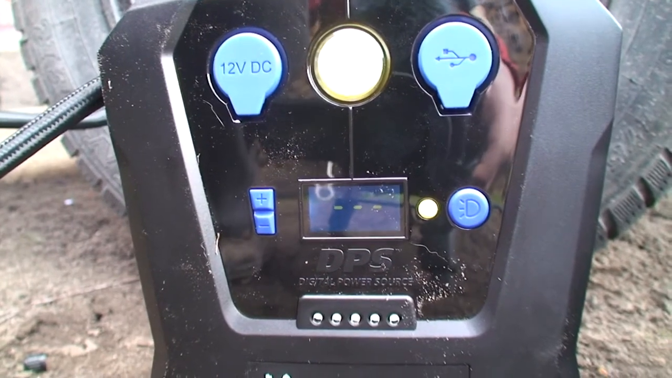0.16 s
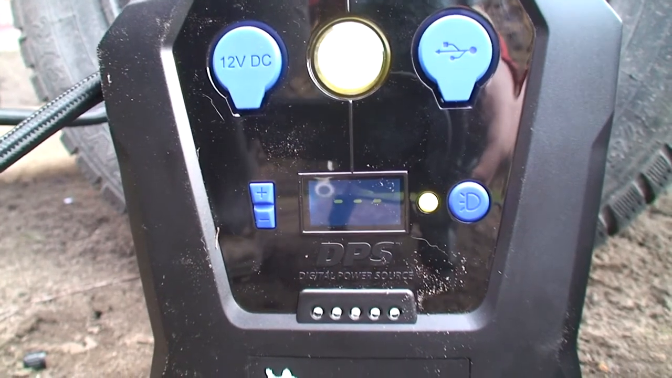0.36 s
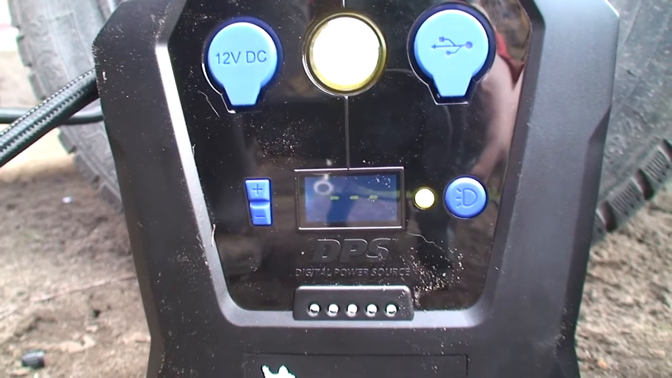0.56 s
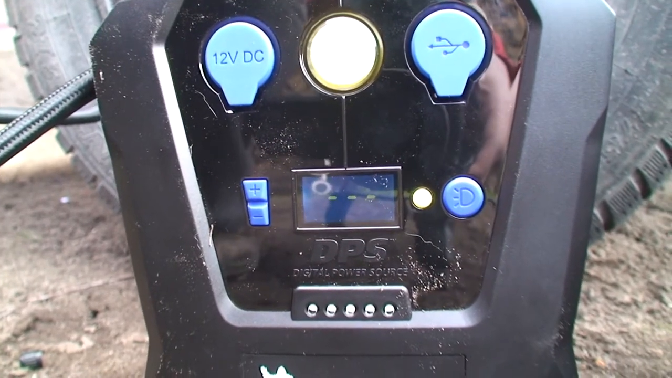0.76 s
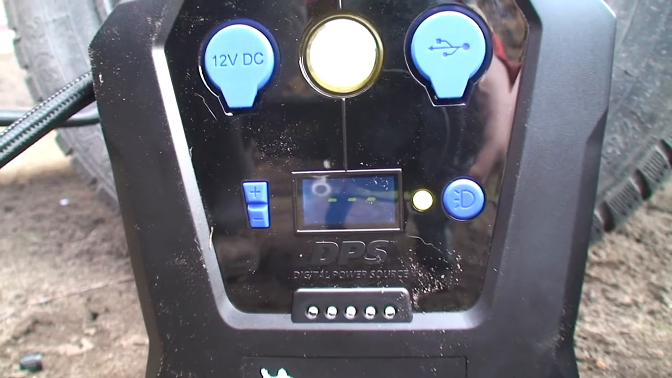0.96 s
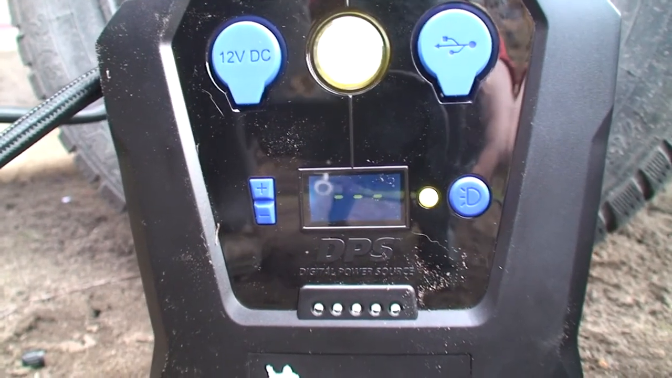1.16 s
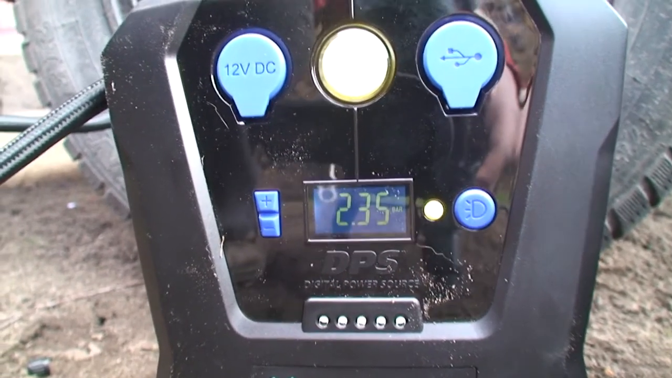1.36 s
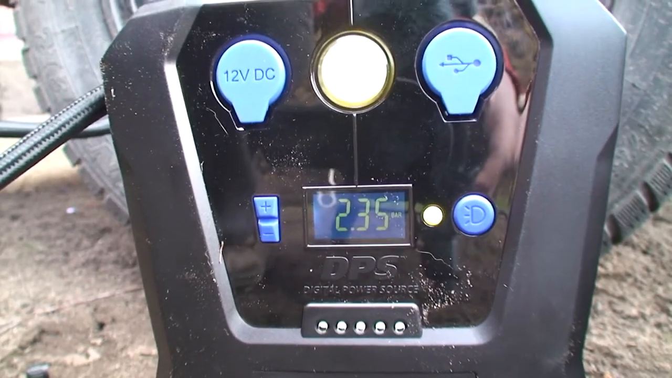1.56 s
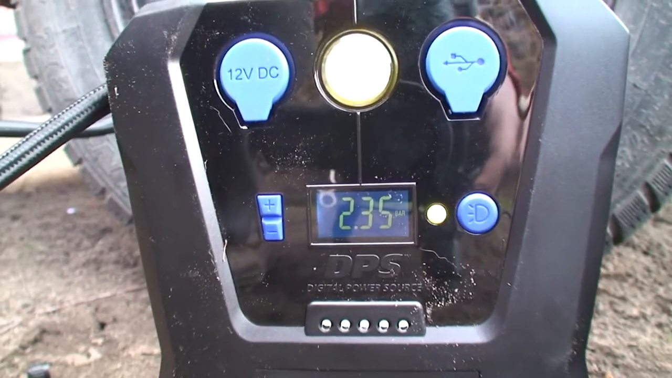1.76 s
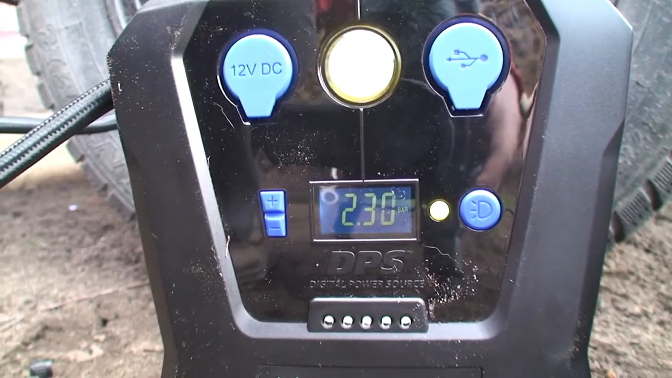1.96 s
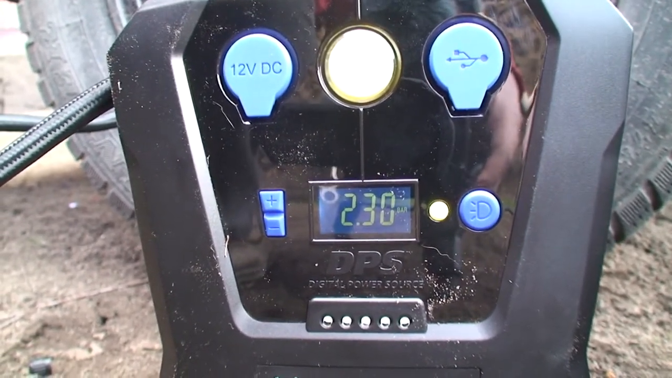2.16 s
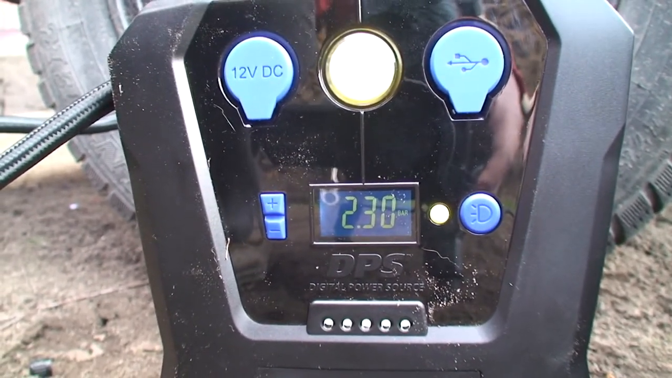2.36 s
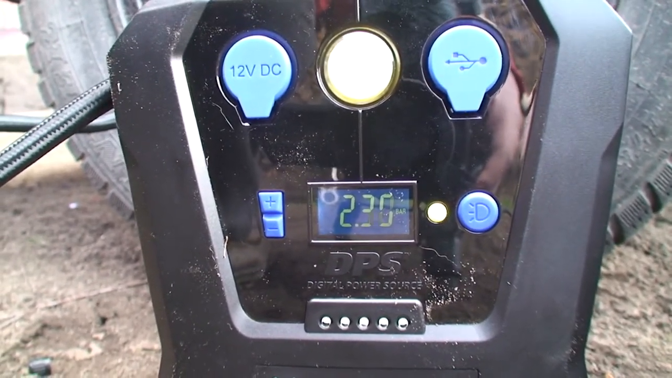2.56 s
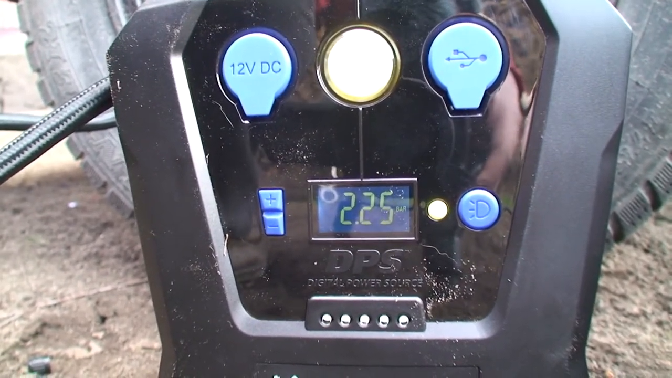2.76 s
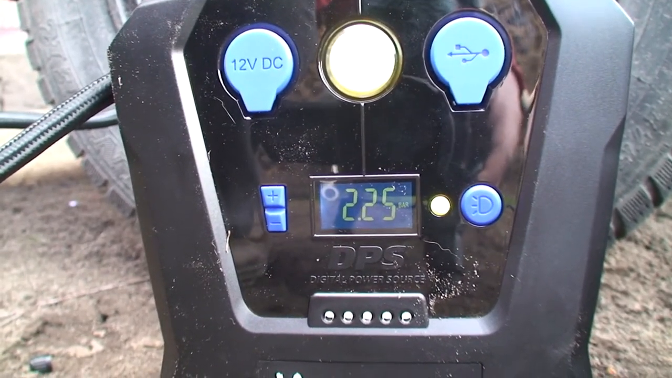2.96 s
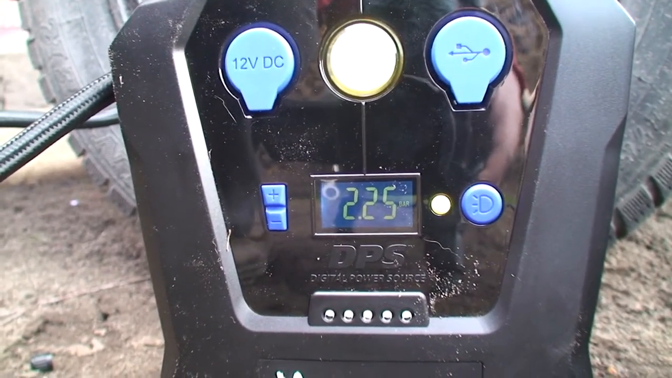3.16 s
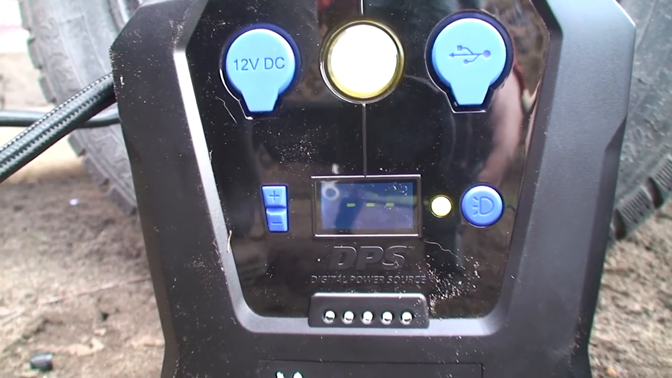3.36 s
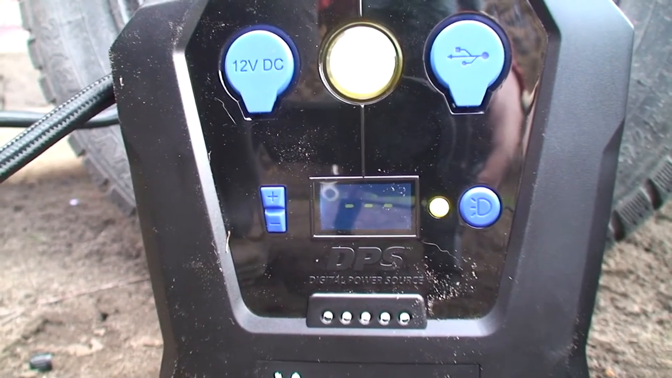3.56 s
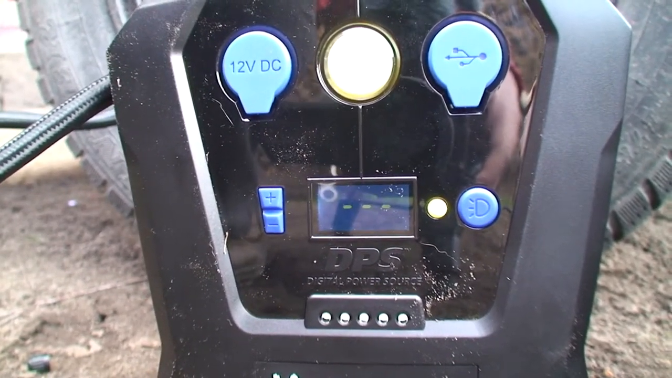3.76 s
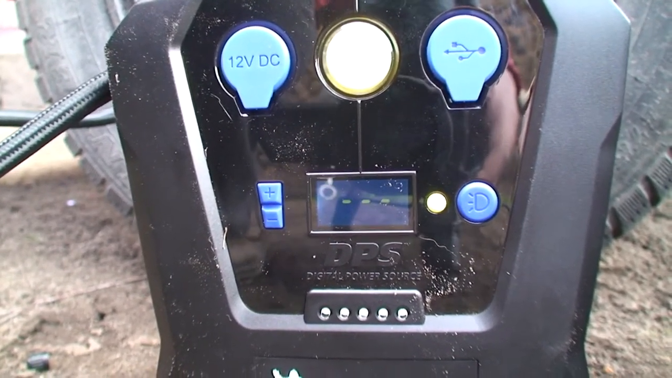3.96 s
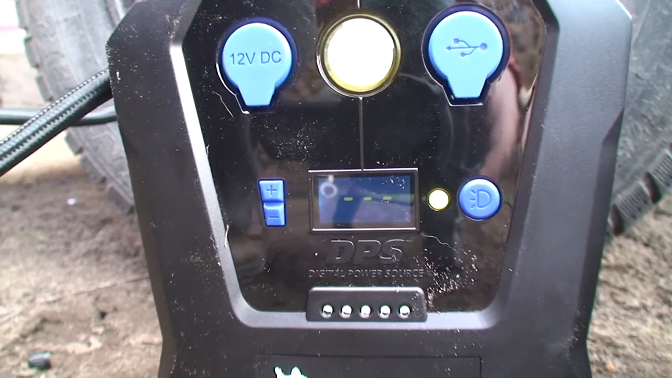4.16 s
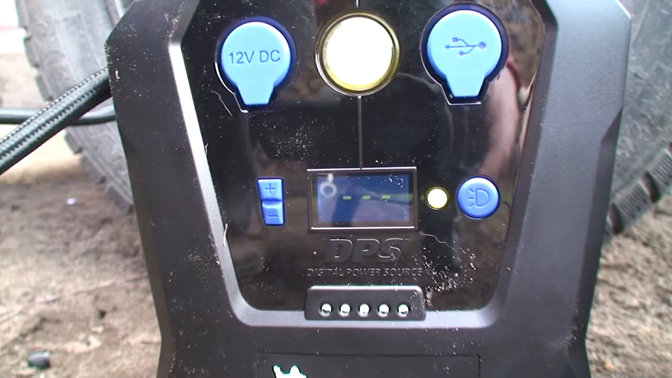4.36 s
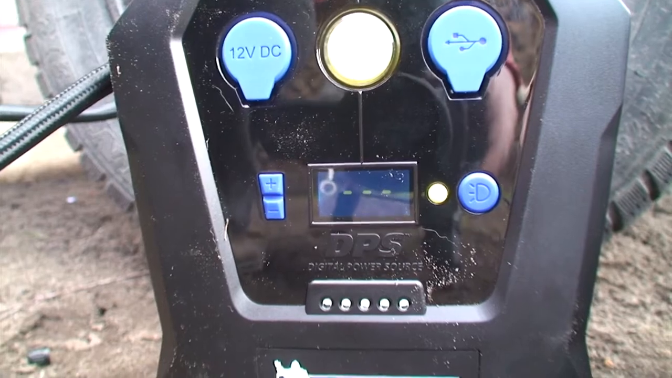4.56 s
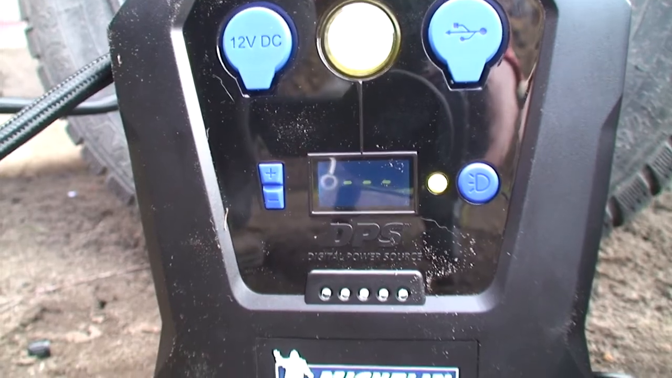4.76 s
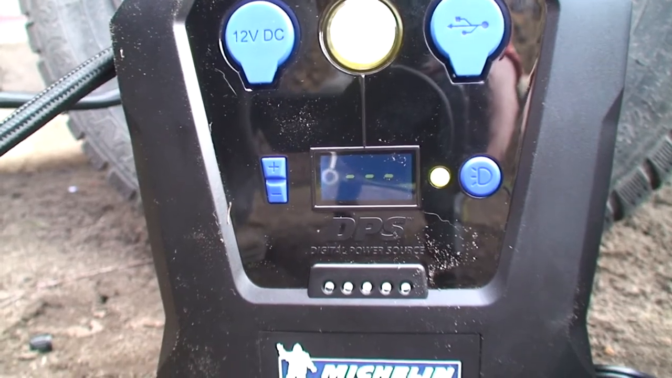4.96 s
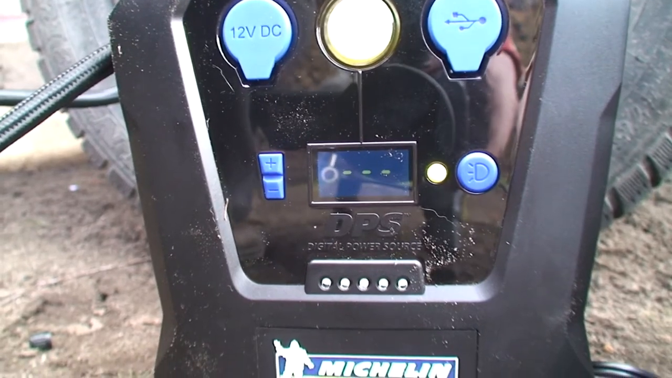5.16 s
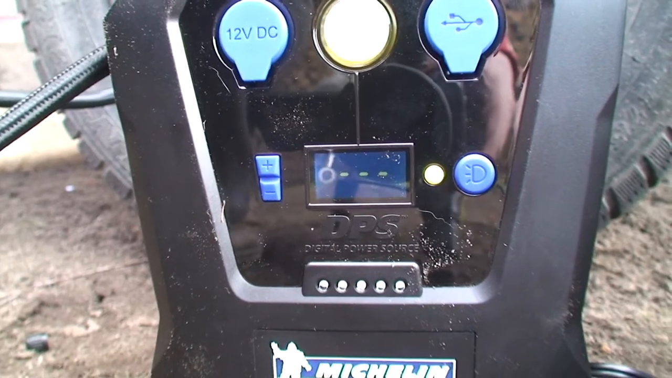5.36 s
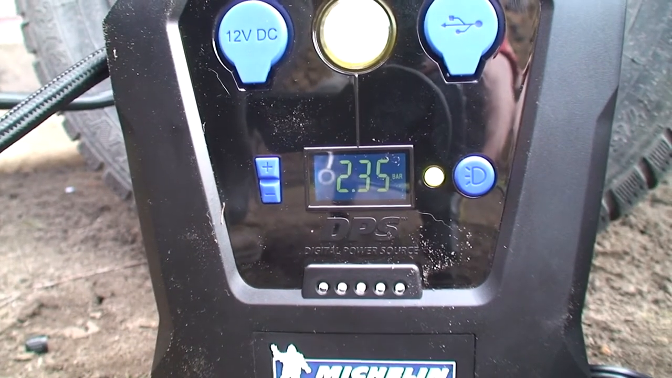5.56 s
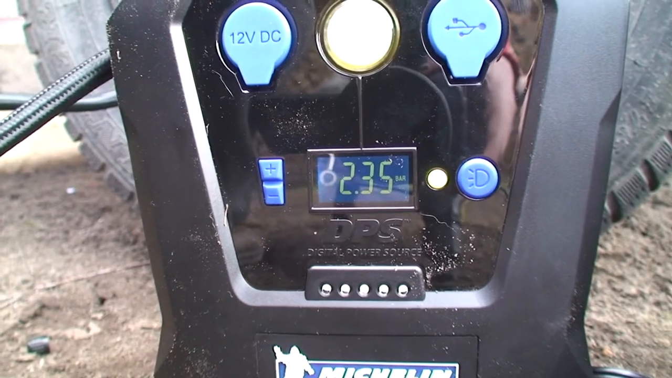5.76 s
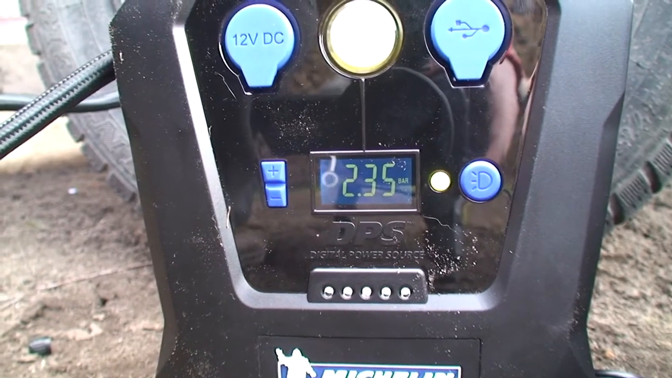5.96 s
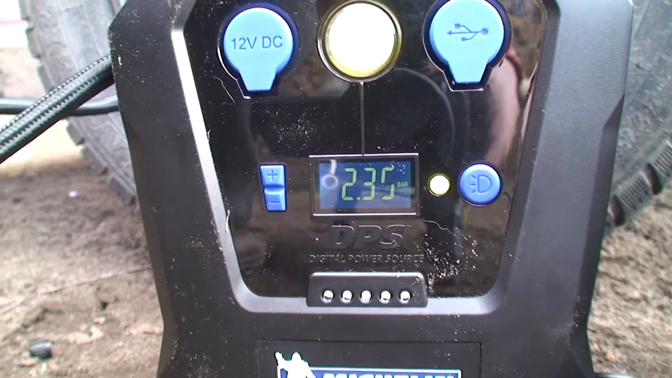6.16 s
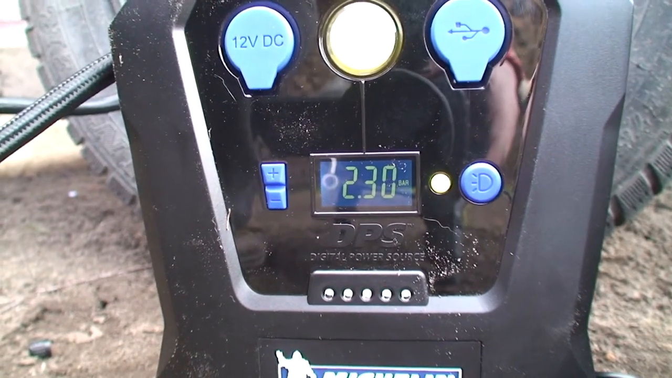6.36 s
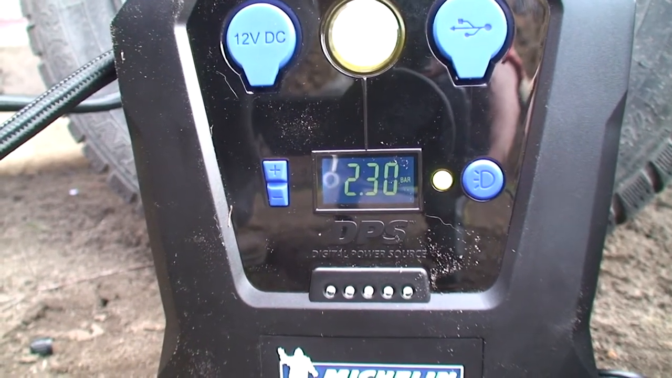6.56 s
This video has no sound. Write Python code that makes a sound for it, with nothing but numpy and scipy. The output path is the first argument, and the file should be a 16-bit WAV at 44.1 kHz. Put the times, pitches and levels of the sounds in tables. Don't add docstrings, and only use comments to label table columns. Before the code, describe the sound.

A portable tyre inflator rattles loudly near the microphone: rapid piston puffs, gear chatter, valve slaps and motor whine fused into a rough drone. It cuts off, slowing briefly into separate clunks, and rests over faint traffic, hiss, tiny bird whistles and dry leaves. Then it bursts back to full speed almost instantly, with a soft handling bump buried in the noise, before stopping again into quiet open air.

```python
import sys
import numpy as np
from scipy import signal
from scipy.fft import rfft, irfft, next_fast_len
from scipy.io import wavfile
from scipy.ndimage import uniform_filter1d, map_coordinates

SR = 44100
rng = np.random.default_rng(int(sys.argv[2]) if len(sys.argv) > 2 else 0)


def dump(signal):
    limited = np.clip(np.atleast_2d(signal).T, -1, 1)
    pcm = np.round(limited * 32767).astype(np.int16)
    wavfile.write(sys.argv[1], SR, pcm)


def boost(x):
    u = np.asarray(x, float) / 20
    return 10 ** u


N = 291501
TIME = np.arange(N) / SR
WHEEL, PINION = 46, 10
CYCLE = 5
ALL_TURNS = 146

# on_s, full_speed_turns_per_s, off_s, coasting_time_constant_s
MOTOR_RUNS = [
    (-1, 43.9161, 1.1007, .0795),
    (3.2257, 44.0357, 5.3554, .0950),
]
DRAG = .0947


def unit(x):
    return x / np.sqrt(np.mean(x[..., :SR] ** 2) + 1e-20)


def along(points, hz):
    f, v = np.transpose(points)
    return np.interp(np.log(hz + 1), np.log(f + 1), v)


def wobble(rate):
    coarse = TIME[::64]
    knots = rng.standard_normal(int(N * rate / SR) + 4)
    return np.interp(TIME, coarse, map_coordinates(knots, [coarse * rate]))


def filtered(x, response):
    m = 2 * next_fast_len(N // 2 + SR // 4)
    return irfft(rfft(x, m) * response(np.fft.rfftfreq(m, 1 / SR)), m)[..., :N]


def causal(db):
    c = irfft(np.log(boost(db)))
    c[1:len(c) // 2] *= 2
    c[len(c) // 2 + 1:] = 0
    return np.exp(rfft(c))


def pulses(times, sizes):
    at = times * SR
    k = np.floor(at)[:, None] + np.arange(-7, 9)
    offset = k - at[:, None]
    w = np.sinc(offset) * np.cos(np.pi * offset / 16) ** 2
    slots = np.where(k < 0, N, np.minimum(k, N)).astype(int)
    return np.bincount(slots.ravel(), (w * sizes[:, None]).ravel(), N + 1)[:N]


def ring(hz, width):
    t = TIME[:SR // 50]
    swell = np.e * np.pi * width * t * np.exp(-np.pi * width * t)
    return swell * np.sin(2 * np.pi * hz * t)


def turns():
    spin_up_s, sag_per_s = .0355, .1933
    first_turn = -.3703
    total = 1e-6
    for on, full, off, coast in MOTOR_RUNS:
        driven_s = np.clip(TIME, on, off) - on
        pull = (full - sag_per_s * driven_s) * (1 - np.exp(-driven_s / spin_up_s))
        coasting = (1 + DRAG) * np.exp(-np.maximum(TIME - off, 0) / coast) - DRAG
        total = total + pull * np.maximum(coasting, 0)
    return first_turn + np.cumsum(total) / SR


def when(turn):
    return np.interp(turn, turns(), TIME, left=-1, right=TIME[-1] + 1)


def stall(run):
    return run[2] + run[3] * np.log(1 + 1 / DRAG)


def piston(speed):
    # multiple_of_running_speed, level_db
    intake = [(1, -25), (2, -13.5), (3, -15), (4, -11.5), (5, -11), (6, -17.5), (7, -12), (8, -10), (9, -5),
              (10, 0.5), (11, -7), (12, -0.5)]
    times = when(np.arange(ALL_TURNS)) - .0022
    colour = [(20, -60)] + [(43.7 * k, db) for k, db in intake]
    colour += [(570, -13), (620, -16), (660, -20), (760, -40), (1500, -60)]
    puff_db = -27.5 + rng.normal(0, 0.18, len(times))
    train = pulses(times, np.interp(times, TIME, speed) ** .75 * boost(puff_db))

    def mouth(hz):
        low = np.minimum(hz, 300)
        late = np.exp(-2j * np.pi * .012 * low * (1 - low / 600))
        return causal(along(colour, hz)) * late

    puffs = filtered(boost(57) * train, mouth)
    ground = [(15, -40), (40, -11.5), (250, -16), (500, 3.5), (700, -29.5), (1500, -59.5)]
    rumble = unit(filtered(rng.standard_normal(N), lambda hz: boost(along(ground, hz))))
    return puffs + boost(-34.5) * speed * rumble


def housing(hz):
    # pitch_hz, width_hz, level_db
    resonances = [(1190, 230, -11.5), (1707, 81, -12.5), (1990, 230, -8), (2248, 36, -6.5),
                  (2560, 40, -4.5), (2705, 83, -6), (3045, 42, -4), (3550, 100, -4.5), (3900, 380, -15.5),
                  (4140, 63, -12.5), (4415, 180, -9.5), (4790, 64, -13.5), (5500, 140, -13.5),
                  (6210, 380, -14), (8690, 300, -26.5), (9600, 250, -23), (10770, 350, -26.5),
                  (14450, 300, -30), (15600, 250, -30.5)]
    # frequency_hz, level_db_per_hz
    casing = [(400, -22), (700, -5.5), (925, -13), (1100, -9), (1620, -17), (2400, -12.5), (3230, -14),
              (3930, -13), (5200, -19.5), (6250, -19.5), (7400, -20), (8300, -24.5), (12700, -47.5),
              (15500, -36)]
    modes = 0
    for c, w, db in resonances:
        modes = modes + boost(2 * db) * (hz * w) ** 2 / ((c * c - hz * hz) ** 2 + (hz * w) ** 2)
    broad = boost(2 * np.maximum(along(casing, hz) - 2.5, -70))
    return causal(10 * np.log10(modes * np.clip(hz / 600, 0, 1) ** 4 + broad))


def effort(crank):
    coast_turns = [-2.2, -1.25, -.7, -.44, -.32, -.23, -.07, .1, .27]
    coast_db = [-1, 1, -12.5, -3.5, -1, -24, -12.5, -17.5, -22.5]
    lead_s, mesh_s = .0015, .028
    level_db, rest = np.zeros(N), np.zeros(N)
    for run in MOTOR_RUNS:
        since_s = TIME - run[0] + lead_s
        on = TIME > run[0] - lead_s
        last = np.floor(np.interp(stall(run), TIME, crank))
        mesh = 1 - np.exp(-np.maximum(since_s, 1e-5) / mesh_s)
        level_db[on] = (np.interp(crank - last, coast_turns, coast_db) + 20 * np.log10(mesh))[on]
        rest[on] = np.maximum(TIME - stall(run), 0)[on]
    return level_db, rest


def band(x, lo_hz, hi_hz):
    return unit(filtered(x, lambda hz: 1 / np.sqrt((1 + (lo_hz / (hz + 1)) ** 12) * (1 + (hz / hi_hz) ** 12))))


def gears(crank, speed):
    # running_db, share_of_effort, duller_when_slow_db, lost_at_rest_db_per_s
    gear_levels = [
        (-19, 0.94, 3, 450),
        (-20.5, 1.05, 5.5, 900),
        (-24.5, 1.05, 8, 700),
        (-20, .8, 2.5, 279),
    ]
    # frequency_hz, level_db_per_hz
    hollow = [(150, -29), (300, -15.5), (520, -6), (730, -3.5), (870, -8), (1000, -18.5), (1500, -49.5)]
    per_tooth = 4
    per_turn = WHEEL * per_tooth
    hit = np.arange(-per_turn, ALL_TURNS * per_turn)
    wheel = rng.standard_normal((3, per_turn))[:, hit % per_turn]
    pinion = rng.standard_normal((2, PINION * per_tooth))[:, hit % (PINION * per_tooth)]
    luck = rng.standard_normal((len(hit), 2))
    size = .6 * wheel[0] + .35 * pinion[0] + .5 * wheel[1] * pinion[1] + .4 * luck[:, 0]
    times = when((hit + .3 * wheel[2]) / per_turn) + 14e-6 * luck[:, 1]
    taps = pulses(times, size * (times > 0))
    taps /= np.sqrt(np.abs(uniform_filter1d(taps ** 2, size=900)) + 0.016)
    hiss = rng.standard_normal(N) * boost(1.7 * wobble(300))

    load = 0.9 * np.cos(2 * np.pi * (crank - .72))
    knocking = taps + .35 * hiss
    mixes = np.array([knocking * boost(1.3 * load), knocking * boost(2 * load), (taps + 1.2 * hiss) * boost(1.2 * load)])
    soft, firm, airy = filtered(mixes, housing)

    sharp, rest = effort(crank)
    even = uniform_filter1d(np.maximum(sharp, -30), size=1800, mode="nearest")
    even = np.minimum(even, sharp + 9)
    levels = []
    for (db, share, dull_db, dies), push in zip(gear_levels, [sharp, sharp, sharp, even]):
        levels.append(db + share * push - dull_db * (1 - speed) - dies * rest)
    low_db, mid_db, treble_db, bass_db = levels

    fizz = band(airy, 4600, 20000)
    top = filtered(fizz, lambda hz: 1 / (1 + (7500 / (hz + 1)) ** 6))
    fizz = fizz - (1 - speed ** 1.1) * top
    shell = unit(filtered(soft, lambda hz: np.exp(-((hz - 1500) / 260) ** 2)))
    body = np.sqrt(0.23 + .75 * speed) * band(soft, 950, 1700) + np.sqrt(.75 - .75 * speed) * shell
    low = boost(low_db - 3.0 * speed) * body
    mid = boost(mid_db - 2.0 * speed) * band(firm, 2000, 4200)
    treble = boost(treble_db - 1.6 * speed) * fizz
    boom = unit(filtered(hiss, lambda hz: boost(along(hollow, hz))))
    return low + mid + treble + boost(bass_db - 9 * speed ** 2) * boom


def motor(crank, speed):
    # multiple_of_motor_speed, added_multiple_of_crank_speed, rms_db
    shaft_tones = [(1, 0, -48), (3, -1, -37), (3, 0, -32), (3, 1, -31), (3, 2, -31), (3, 3, -39),
                   (0, 16, -30), (0, 17, -35), (0, 18, -39), (0, 19, -38), (4, -2, -34), (4, 0, -39),
                   (4, 7, -40), (6, -11, -37), (6, -2, -40), (6, 0, -37), (8, -11, -38), (8, -8, -37),
                   (0, 26, -40), (0, 29, -37), (6, 8, -39), (8, -1, -39), (0, 37, -31), (6, 9, -40),
                   (8, 0, -42), (9, -4, -40), (9, -1, -40), (0, 39, -36), (0, 52, -39.5), (6, 30, -37)]
    tones = 0
    for m, k, db in shaft_tones:
        level = boost(db + 3 + wobble(6))
        cycles = (m * WHEEL / PINION + k) * crank + rng.random()
        tones = tones + level * np.sin(2 * np.pi * cycles + .2 * wobble(9))
    since = np.min([np.where(TIME > on, TIME - on, np.inf) for on, *_ in MOTOR_RUNS], axis=0)
    return tones * speed ** 5.0 * (1 - np.exp(-since / 0.1))


def valves(speed):
    # share_of_turn_after_puff, pitch_hz, width_hz, peak_db
    slaps = [(.45, 3900, 400, -22), (.58, 2553, 350, -27.5), (.56, 6270, 400, -22), (0.662, 4224, 450, -18),
             (0.681, 5860, 400, -22), (0.784, 1617, 121.9, -27.5), (0.849, 3887, 450, -17)]
    turn, out = np.arange(ALL_TURNS), np.zeros(N)
    for angle, hz, width, db in slaps:
        repeating_db = 2.2 * rng.standard_normal(CYCLE)[turn % CYCLE]
        size = boost(db + repeating_db + 1.5 * rng.standard_normal(len(turn)))
        times = when(turn + angle) + 25e-6 * rng.standard_normal(len(turn))
        out += signal.oaconvolve(pulses(times, size), ring(hz, width))[:N]
    return out * speed ** 2


def proud_tooth(speed):
    stretches = [
        (3.78, 48),
        (54.78, 143),
    ]
    # pitch_hz, width_hz, peak_db
    shell_ring = (1625, 190, -12.5)
    hz, width, db = shell_ring
    times = when(np.concatenate([np.arange(first, last, CYCLE) for first, last in stretches]))
    size = boost(db + 1.8 * rng.standard_normal(len(times)))
    return speed ** 2 * signal.oaconvolve(pulses(times, size), ring(hz, width))[:N]


def traffic_and_hiss():
    # frequency_hz, level_db_per_hz
    floor = [(15, -43.5), (25, -7), (36, -9.5), (50, -3), (100, -4), (190, -8), (390, -10.5), (660, -19),
             (930, -18.5), (1700, -25.5), (8000, -29.5), (15800, -30)]
    # frequency_hz, likeness_0_to_1
    likeness = [(60, 0.6), (130, 0.35), (290, 0.54), (1400, 0.15), (3100, 0.045), (7000, 0)]

    def middle_and_side(hz):
        angle = np.arccos(np.clip(along(likeness, hz), 0, 1)) / 2
        return boost(along(floor, hz)) * [np.cos(angle), np.sin(angle)]

    mid, side = filtered(rng.standard_normal((2, N)), middle_and_side)
    return boost(-58.5 + .6 * wobble(2.5)) * unit(np.array([mid + side, mid - side]))


def hum():
    # pitch_hz, rms_db, left_minus_right_db
    hum_tones = [(70.303, -55.5, -6), (286, -73, -1.5)]
    out = np.zeros((2, N))
    for hz, db, pan_db in hum_tones:
        level = boost(db + 1.5 + .5 * wobble(8) + np.array([[.5], [-.5]]) * pan_db)
        out += level * np.sin(2 * np.pi * hz * TIME + .2 * wobble(7))
    return out


def settling():
    # start_s, peak_db, fade_by_60_db_s, top_hz
    rattles = [
        (1.357, -50, .1, 900),
        (5.629, -42, .05, 2100),
    ]
    out, t = np.zeros(N), TIME[:SR // 8]
    for s, db, t60, top_hz in rattles:
        rattle = boost(db + 11 - 60 * t / t60) * (t < t60 / 4) * rng.standard_normal(len(t))
        sos = signal.butter(3, [400, top_hz], "band", fs=SR, output="sos")
        out[round(s * SR):][:len(t)] += signal.sosfilt(sos, rattle)
    return out


def bird():
    # start_s, length_s, pitch_hz, level_db
    song = [
        (1.628, .065, 4672, -78.5),
        (1.75, .03, 4660, -80),
        (1.79, 0.1387, 3740, -77),
        (2.11, .19, 4608, -82),
        (2.31, .075, 3740, -82),
        (2.417, .05, 3740, -83.5),
    ]
    out = np.zeros(N)
    for s, length, hz, db in song:
        note = np.clip(np.minimum(TIME - s, (s + length - TIME) / 2) / .008, 0, 1)
        level = boost(db + 5.5 + 1.5 * wobble(40))
        out += level * note * np.sin(2 * np.pi * hz * TIME + 0.72 * wobble(60))
    return out


def leaves():
    # time_s, level_db
    rustle = [(1.9, -100), (2.03, -72), (2.2, -74), (2.4, -71.5), (2.55, -81), (2.7, -100)]
    s, db = np.transpose(rustle)
    flutter = rng.standard_normal(N) * boost(2 * wobble(60))
    dry_leaves = filtered(flutter, lambda hz: np.exp(-(np.log((hz + 1) / 2900) / .45) ** 2))
    return boost(np.interp(TIME, s, db)) * unit(dry_leaves)


def camera_bumps():
    # time_s, peak_db, pitch_hz
    bumps = [
        (4.765, -33.5, 167.6),
        (4.82, -26, 118.7),
    ]
    out = np.zeros(N)
    for s, db, hz in bumps:
        out += boost(db) * np.exp(-((TIME - s) / 0.014) ** 2) * np.sin(2 * np.pi * hz * TIME)
    return out


def spread(x):
    # frequency_hz, left_minus_right_db
    lean = [(60, -0.8), (200, 0.2), (380, -3), (700, -2), (1290, -1.9), (2400, -1.3), (8000, 0.5),
            (15000, -3.5)]
    # frequency_hz, level_db
    scatter = [(30, -10), (60, -34), (300, -17.5), (1400, -17), (3100, -14), (7000, -10.5), (10000, -9),
               (14000, -14)]
    echo = rng.standard_normal(SR // 4) * boost(-60 * TIME[:SR // 4] / .13)
    echoed = signal.fftconvolve(x, echo / np.linalg.norm(echo))[:N]
    side = filtered(echoed, lambda hz: boost(along(scatter, hz)))
    direct = filtered(x, lambda hz: boost(np.outer([.5, -.5], along(lean, hz))))
    return direct + [side, -side]


def scene():
    crank = turns()
    smooth_crank = uniform_filter1d(crank, size=1000, mode="nearest")
    speed = np.clip(np.gradient(smooth_crank) * SR / 43.5, 0, 1)
    speed[:SR // 20] = 1
    machine = piston(speed) + gears(crank, speed) + motor(crank, speed) + valves(speed) + proud_tooth(speed)
    near = spread(machine + settling() + camera_bumps())
    return near + traffic_and_hiss() + hum() + bird() + leaves()


def low_pass(x):
    return signal.sosfilt(signal.butter(12, 16810, fs=SR, output="sos"), x)


def record(dry):
    soft = dry / (1 + np.abs(dry / .8) ** 5) ** (1 / 5)
    return low_pass(filtered(soft, lambda hz: hz < 15780))


dry = scene()
out = record(dry)
dump(out)
```